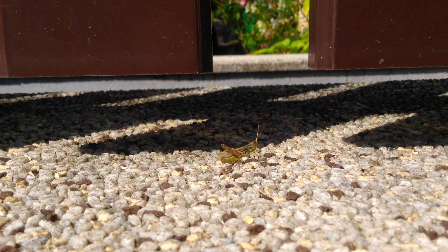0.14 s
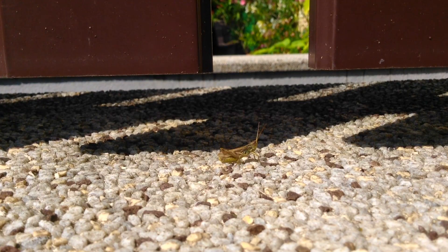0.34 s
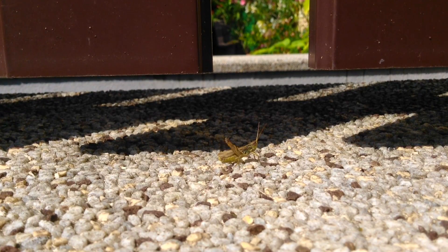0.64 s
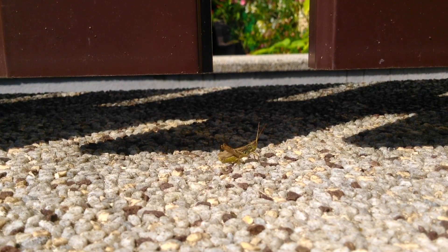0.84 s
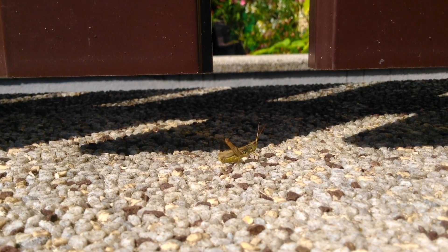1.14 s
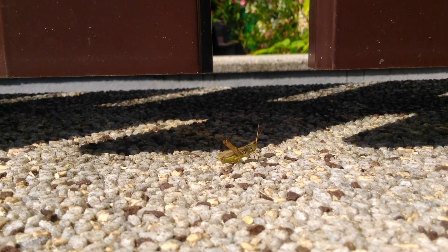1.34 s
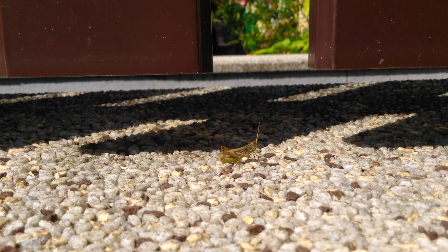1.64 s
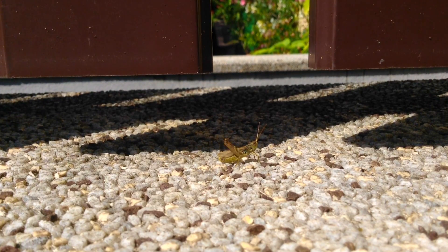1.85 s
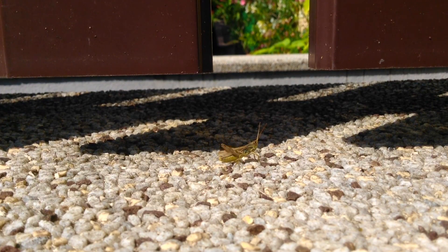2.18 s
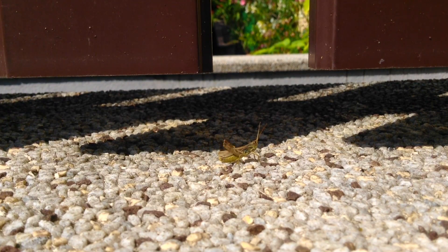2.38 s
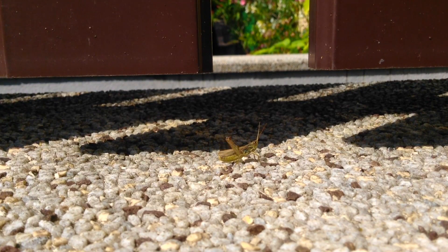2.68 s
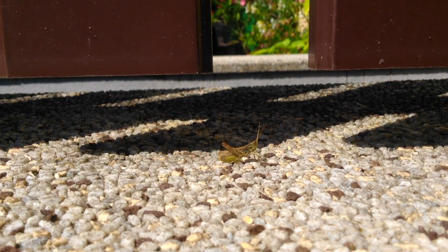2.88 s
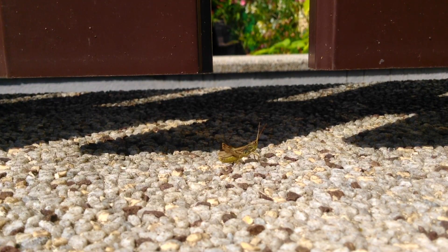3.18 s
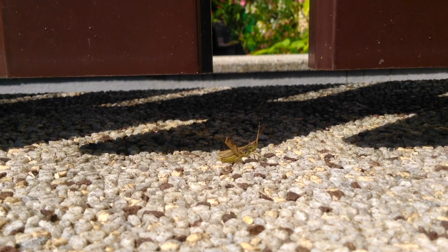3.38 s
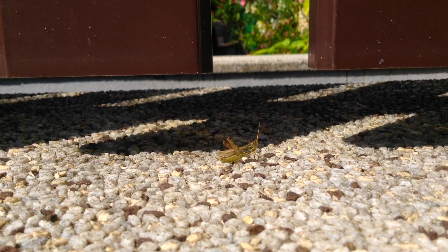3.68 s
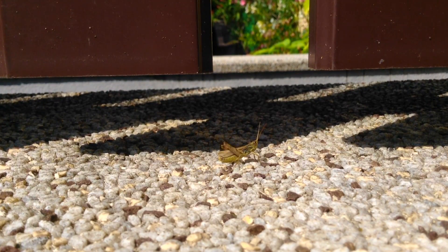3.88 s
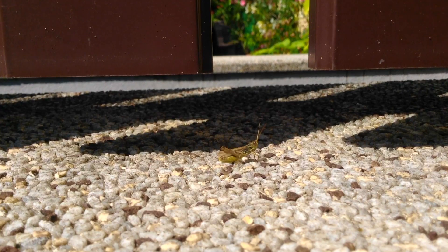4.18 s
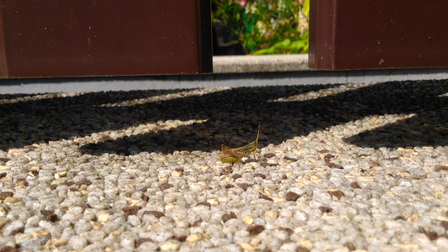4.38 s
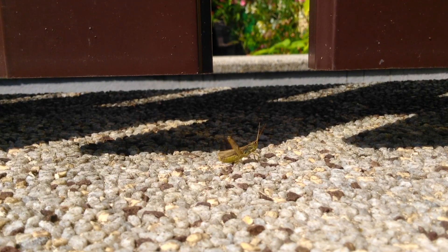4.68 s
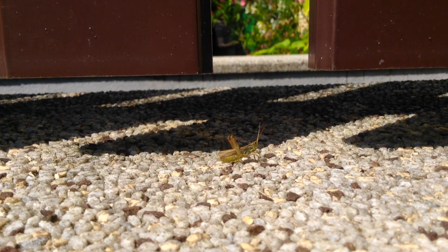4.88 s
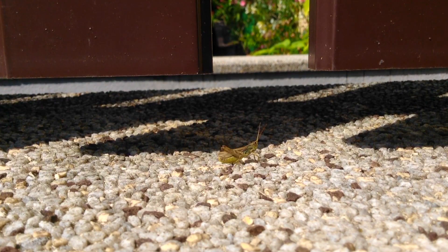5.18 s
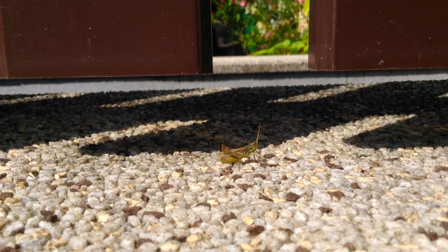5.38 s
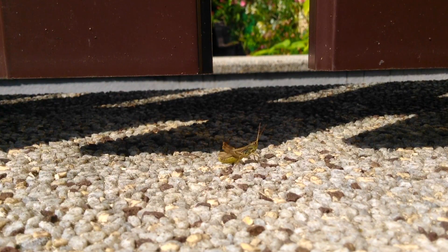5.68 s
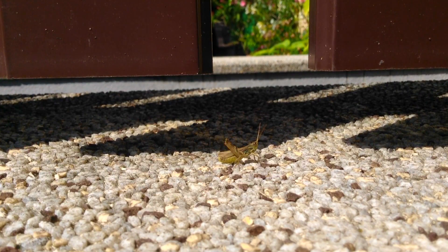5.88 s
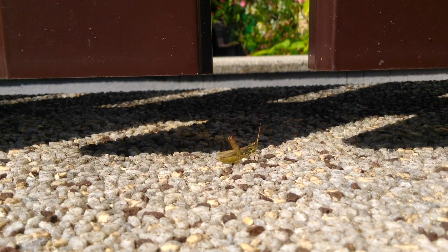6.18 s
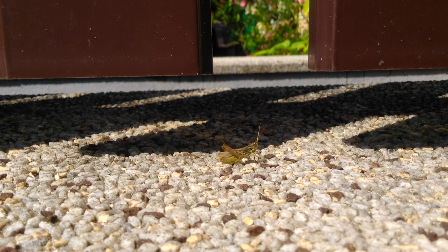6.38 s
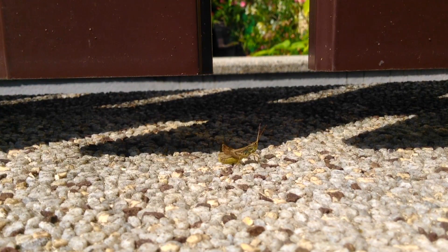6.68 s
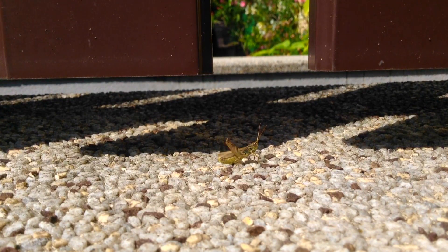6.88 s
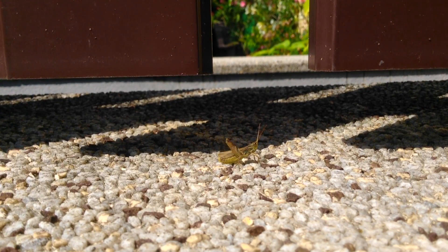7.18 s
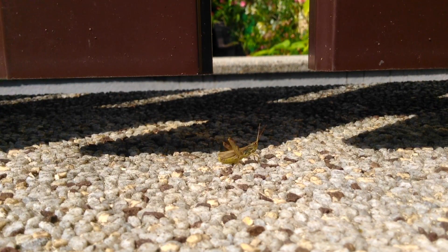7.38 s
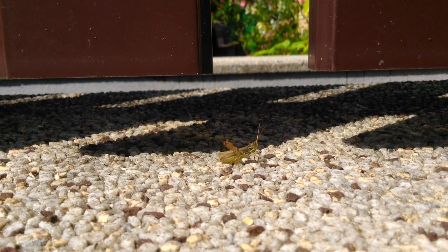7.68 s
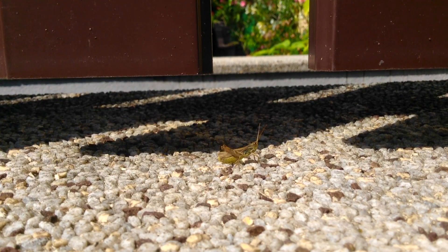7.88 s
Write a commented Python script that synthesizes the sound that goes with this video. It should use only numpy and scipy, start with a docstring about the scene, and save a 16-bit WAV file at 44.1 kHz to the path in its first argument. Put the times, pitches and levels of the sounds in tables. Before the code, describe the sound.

A grasshopper sings close to the microphone on outdoor paving for the whole eight seconds. Its song is high, dry and buzzy, pulsing about four and a half times a second; each pulse is a sharp little zip, a tiny rest and two rasping swells. It begins fairly soft and builds. At about 2.2 seconds it falters for an instant in a crackle of dry clicks, then resumes at once and grows louder, strongest from about 6 seconds to the end. Occasional tiny clicks dot the rasping, and the paving adds a very faint, short echo. Far behind and much quieter, an engine drones unevenly, most noticeable at the start, around 3.5 seconds and from 5.5 to 7 seconds. Faint machinery hums low, and distant road traffic swells and fades near the start, around 3.5 to 4 seconds, 6.5 seconds and the end.

```python
"""A grasshopper sings close by on sunny paving, rubbing the tiny pegs on its hind legs along its wings.
About 4.5 times a second the legs flick down in a sharp zip, rest, then draw two rasping swells.
The song grows louder and falters once, when the legs slip. The paving adds a faint echo.
Far off, an engine drones, machinery hums and road traffic swells and fades."""
import sys
import numpy as np
from scipy import signal
from scipy.fft import rfft, irfft, next_fast_len
from scipy.io import wavfile
from scipy.ndimage import uniform_filter1d, map_coordinates

SR = 44100
rng = np.random.default_rng(int(sys.argv[2]) if len(sys.argv) > 2 else 0)


def to_wav(s):
    """Save 16-bit WAV."""
    ch = np.atleast_2d(s).T  # columns
    pcm = np.round(np.clip(ch, -1, 1) * 32767)  # PCM
    wavfile.write(sys.argv[1], SR, pcm.astype(np.int16))


N = 355005

# Each quick flick of the legs opens one cycle of the song:
# (time [s], level [dB], peg rate [Hz], time the legs lift beforehand [s], trailing leg's pressure [dB])
FLICKS = [(0.017, -30.5, 7510, 0.0083, -20), (0.25, -25.5, 7000, 0.008, -16),
          (0.486, -27, 7600, 0.007, -20), (0.722, -26.0, 6720, 0.01, -3), (0.9585, -27.5, 5700, 0.0069, -9),
          (1.1946, -24.5, 6800, 0.006, -9), (1.4281, -25.5, 5750, 0.008, -16),
          (1.654, -22.7, 7400, 0.008, -16), (1.8814, -24.0, 7250, 0.008, -7),
          (2.1122, -24.5, 6540, 0.0084, -11), (2.3132, -30.5, 7100, 0.001, -12),
          (2.531, -24, 6910, 0.007, -20), (2.755, -23.0, 6490, 0.007, -20), (2.9737, -24, 6460, 0.001, -2),
          (3.1972, -23.5, 7500, 0.008, -20), (3.4177, -24.0, 6800, 0.001, -2),
          (3.6385, -23.0, 7150, 0.001, -11), (3.8608, -22.5, 6720, 0.002, -8),
          (4.0807, -22.5, 6150, 0.001, 0), (4.301, -22.5, 6540, 0.002, -14),
          (4.5185, -21, 6470, 0.0072, -13), (4.7388, -20.5, 6550, 0.001, -6),
          (4.9561, -19.5, 6770, 0.0064, -14), (5.17, -19.5, 6860, 0.0071, -20),
          (5.3917, -18, 6820, 0.0074, -20), (5.6081, -19, 6610, 0.001, -7),
          (5.8248, -18.0, 7100, 0.002, -4), (6.039, -18.5, 6750, 0.005, -2), (6.257, -17, 6760, 0.006, -20),
          (6.4757, -20.0, 6560, 0.001, -3), (6.6943, -17.5, 6700, 0.001, -14),
          (6.9133, -18.3, 6580, 0.00095, -16), (7.128, -19, 6420, 0.001, -2),
          (7.3415, -17, 6650, 0.0069, -20), (7.5527, -19.0, 6940, 0.002, -10),
          (7.7679, -17.5, 6790, 0.0074, -20), (7.9825, -18.5, 6780, 0.0084, -12)]
# How hard the insect rasps; the song builds, falters and builds again: (time [s], level [dB])
EFFORT = [(0, -38), (.9, -36.5), (1.8, -34), (2.4, -34.6), (2.9, -34), (4.4, -31.5), (6.2, -30), (8, -29.5)]
USUAL_EFFORT_DB = -32  # strokes below this count as soft


def amp(db):
    """Turn decibels into a gain to multiply by."""
    return 10 ** (np.asarray(db) / 20)


def unit(x):
    """Scale a signal to an average power of 1."""
    return x / np.sqrt(np.mean(x ** 2) + 1e-20)


def curves(rows, at=None):
    """Join a table's points with straight lines, read at the given places or at every sample's time."""
    places, *columns = np.transpose(rows)
    return [np.interp(np.arange(N) / SR if at is None else at, places, column) for column in columns]


def wobble(rate):
    """A smooth random curve through `rate` new values a second."""
    return map_coordinates(rng.standard_normal(int(N * rate / SR) + 4), [np.arange(N) * rate / SR])


def swell(x, centre, width, flatness):
    """A smooth hump of height 1: flatness 2 is a bell, more gives a flat top."""
    return np.exp(-np.abs((x - centre) / width) ** flatness)


def ring(x, spectrum, size=2048):
    """Let x shake a body that favours some pitches, given as (frequency [Hz], level [dB])."""
    hz, db = np.transpose(spectrum)
    log_gain = np.log(amp(np.interp(np.log(np.fft.rfftfreq(size, 1 / SR) + 1), np.log(hz), db)))
    # this folding makes the body ring only after it is struck, never before
    cepstrum = irfft(log_gain)
    cepstrum[1:size // 2] *= 2
    cepstrum[size // 2 + 1:] = 0
    response = irfft(np.exp(rfft(cepstrum)))
    return signal.fftconvolve(x, response / np.linalg.norm(response))[:N]


def noise(spectrum):
    """Steady noise with the given balance of low and high pitches."""
    return unit(ring(rng.standard_normal(N), spectrum))


def patchy(x, depth_db):
    """Moving air makes each narrow band of a far sound come and go."""
    bands = signal.stft(x, nperseg=2048)[2]
    patches = uniform_filter1d(rng.standard_normal(bands.shape), size=3, axis=0)
    patches = unit(uniform_filter1d(patches, size=7, axis=1))
    return unit(signal.istft(bands * amp(depth_db * patches), nperseg=2048)[1][:N])


def traffic(road_db=-66, wash_db=-62.5, sway_db=.8):
    """Each far vehicle raises the road's rumble and tyre hiss, over a low drone of streets."""
    # Tone of the rumble, the tyres and the streets: (frequency [Hz], relative level [dB])
    rumble_tone = [(25, -48), (70, -44), (100, -30), (135, -19), (165, -6), (215, 3), (260, 0.5),
                   (320, -4.5), (400, -12.5), (520, -27.5), (900, -42)]
    tyre_tone = [(25, -31), (70, -29), (150, -6), (300, -7), (480, -0.5), (590, 4), (720, 0.5), (900, 2),
                 (1400, -2), (2000, -10.5), (4000, -8), (9000, -17), (15000, -19.5)]
    town_tone = [(25, -31), (70, -21), (100, -7), (135, 2), (180, 2), (300, -13.5), (600, -25)]
    # Vehicles going by: (time when nearest [s], half length [s], rumble [dB], tyre hiss [dB])
    passes = [(.12, 0.8, -57, -75), (3.52, .36, -54, -69), (4.02, .25, -57, -66), (4.72, .16, -66, -69),
              (6.42, .8, -53.3, -65.5), (7.95, .3, -54.5, -70)]
    # Loudness of the streets: (time [s], level [dB])
    town_level = [(0, -66.5), (4.1, -66.5), (4.9, -71), (8, -68.5)]
    t = np.arange(N) / SR
    at, length, rumble_db, tyre_db = np.transpose(passes)[..., None]
    nearness = swell(t, at, length, flatness=3) * amp(sway_db * wobble(6))
    rumble_gain = amp(road_db) + np.sum(amp(rumble_db) * nearness, axis=0)
    tyre_gain = amp(wash_db) + np.sum(amp(tyre_db) * nearness, axis=0)
    rumble = rumble_gain * patchy(noise(rumble_tone), depth_db=2.5)
    tyres = tyre_gain * patchy(noise(tyre_tone), depth_db=2.7)
    town_db, = curves(town_level)
    return rumble + tyres + amp(town_db) * noise(town_tone)


def hum(waver=.005, flutter_db=2, fade_db_per_s=20):
    """Far machinery gives faint, slightly unsteady tones that fade in and out."""
    # Each machine tone: (pitch [Hz], level [dB], start [s], end [s])
    tones = [(127, -69, 0.3, 4.4), (260, -64.5, 5, 8.05), (384, -71.8, 2.1, 5.6)]
    t = np.arange(N) / SR
    sound = np.zeros(N)
    for hz, db, start, end in tones:
        level_db = db - fade_db_per_s * np.abs(t - np.clip(t, start, end)) + flutter_db * wobble(2.91)
        angle = 2 * np.pi * np.cumsum(hz * (1 + waver * wobble(7.3))) / SR
        sound += amp(level_db) * np.sin(angle)
    return np.sqrt(2) * sound


def engine(firing_hz=97.35, rise_hz_per_s=1.25, waver=.004, flutter_db=1.3, rough_db=1.6, idle_db=-68):
    """A far engine slowly speeds up and swells under load; the air makes each tone flutter on its own."""
    # The engine's tones: (multiple of the firing rate, relative level [dB])
    harmonics = [(1, -37), (2, 0), (3, -6.5), (4, -28), (5, -24), (6, -21.5), (9, -28)]
    # Spells of hard work: (start [s], end [s], level [dB], extra bark in the third tone [dB])
    loads = [(0.02, .5, -48.5, 0), (.6, .8, -54, 4), (.95, 1.2, -56, -9), (1.6, 1.95, -64.5, 7),
             (3.24, 3.34, -54.5, 9), (3.62, 3.7, -50.5, -7), (3.76, 4.08, -62, 12.5), (4.45, 4.56, -56, -9),
             (4.95, 5.1, -60.5, -6), (5.5, 6.85, -56.5, -5), (7.8, 8.05, -61, 4)]
    t = np.arange(N) / SR
    hz = firing_hz + rise_hz_per_s * t
    angle = 2 * np.pi * np.cumsum(hz * (1 + waver * wobble(9))) / SR
    start, end, load_db, extra_db = np.transpose(loads)[..., None]
    before, after = np.maximum(start - t, 0), np.maximum(t - end, 0)
    # both rise at 95 dB a second, but the bark dies away faster than the drone
    drone_db = np.maximum(idle_db, np.max(load_db - 95 * before - 24 * after, axis=0))
    bark_db = np.maximum(idle_db, np.max(load_db + extra_db - 95 * before - 55 * after, axis=0))
    sound = np.zeros(N)
    for multiple, db in harmonics:
        level_db = (bark_db if multiple == 3 else drone_db) + db
        sound += amp(level_db + flutter_db * wobble(5) + rough_db * wobble(24)) * np.sin(multiple * angle)
    return np.sqrt(2) * sound


def paving_echo(x, echo_db=-25, fade_s=.051):
    """The paving and a door behind it add a faint, short echo."""
    t = np.arange(SR // 4) / SR
    tail = rng.standard_normal(len(t)) * amp(-60 * t / fade_s) * (t > .002)
    return x + amp(echo_db) * signal.fftconvolve(x, tail / np.linalg.norm(tail))[:N]


def leg_cycle(rest_s=.036, rest_scatter_s=.0016, trail_fall_db_per_s=500):
    """The legs lift, flick, rest and land again; `phase` runs from 0 to 1 between two flicks."""
    t = np.arange(N) / SR
    start, _, _, lift_s, trail_db = np.transpose(FLICKS)
    period = np.median(np.diff(start))
    edges = np.concatenate([[start[0] - period], start, [start[-1] + period]])
    cycle = np.clip(np.searchsorted(edges, t) - 1, 0, len(start))
    since, until = t - edges[cycle], edges[cycle + 1] - t
    phase = since / (since + until)
    rest = rest_s + rest_scatter_s * rng.standard_normal(len(edges))
    landed_s = np.maximum(since - rest[cycle], 0)
    lifted = (since < rest[cycle]) | (until < np.append(lift_s, 0)[cycle])
    # a leg that lags behind the other rasps on through the flick as it lifts
    trailing_db = np.append(0, trail_db)[cycle] - trail_fall_db_per_s * since
    return landed_s, phase, lifted, trailing_db


def pushes(phase, speed_lag=.11):
    """The legs bear down twice strongly and once lightly, speeding up just after each push."""
    # Pushes: (place [share of cycle], width [share of cycle], added pressure [dB], added speed [dB])
    humps = [(.298, .095, 4.1, 12.5), (.708, .1, 4.6, 11.6), (.918, .071, 2.3, 7.8)]
    push_db = sum(db * swell(phase, at, width, 3.1) for at, width, db, _ in humps)
    speed_db = sum(db * swell(phase, at + speed_lag, width * 1.04, 2.5) for at, width, _, db in humps)
    return push_db, speed_db


def hitches(phase, softness_db, stray=.022):
    """Pressure lost [dB] as the legs let go for an instant after a push, most of all in soft strokes."""
    # The lapses: (place [share of cycle], width [share of cycle], loss at a depth of 1 [dB])
    lapses = [(.425, .007, 4.5), (.835, .007, 5.5)]
    place = phase + stray * wobble(11)
    depth = np.maximum(.7 + .14 * softness_db + .5 * wobble(9), 0)
    return depth * sum(db * swell(place, at, width, 2) for at, width, db in lapses)


def slip(slip_s=2.202, regrip_s=2.3135, half_grip_s=.038, floor_db=-32, judder_db=3.5, thinning_s=.05):
    """The falter: the wing booms, then the loose legs skip along it and ever fewer pegs catch."""
    t = np.arange(N) / SR
    late = np.maximum(t - slip_s, 0)
    loose = (t > slip_s) & (t < regrip_s)
    loosening_db = np.maximum(20 * np.log10(.5) * (late / half_grip_s) ** 2, floor_db)
    grip_db = loose * (loosening_db - judder_db * np.abs(wobble(180)))
    caught = np.where(loose, .9 * np.exp(-late / thinning_s), 1)
    # the wing's soft skin is 20 dB louder as the legs let go, and 7 dB quieter while they are loose
    boom_db = 20 * (t <= slip_s) * swell(t, slip_s, width=.012, flatness=2) - 7 * loose
    return grip_db, caught, boom_db


def strikes(rate, scatter_db, caught=1, jitter=.22):
    """A row of pegs makes about `rate` tiny clicks a second; only the share `caught` sounds."""
    rate = np.clip(rate, 1, SR)
    passed = np.cumsum(rate) / SR
    pegs = np.arange(int(passed[-1]))
    at = np.searchsorted(passed, pegs + jitter * rng.standard_normal(len(pegs))).clip(0, N - 1)
    size = unit(amp(scatter_db * rng.standard_normal(len(pegs)))) * rng.choice([-1, 1], len(pegs))
    return np.bincount(at, size, N) * np.sqrt(SR / rate) * (rng.random(N) < caught)


def chatter(centre_hz, width_hz=750):
    """The leg's whistling chatter: a narrow band of noise that glides with centre_hz."""
    angle = 2 * np.pi * np.cumsum(centre_hz) / SR
    smooth = signal.butter(2, width_hz, fs=SR, output="sos")
    a, b = signal.sosfilt(smooth, rng.standard_normal((2, N)))
    return unit(a * np.cos(angle) + b * np.sin(angle))


def snags(scuff_db=-21, fade_s=.003):
    """Single pegs catch and snap free, each with a dry click and a trace of scuffing."""
    # The snaps, thickest in the falter: (time [s], level [dB])
    snaps = [(.0365, -35), (.2695, -35), (.478, -23), (.503, -36), (.9415, -24), (.9755, -32),
             (1.2146, -33), (2.2048, -19), (2.2056, -17), (2.2255, -25), (2.227, -26), (2.2293, -23.5),
             (2.2303, -24), (2.2312, -25), (2.2387, -26), (2.2396, -25), (2.2414, -27.5), (2.2498, -28.5),
             (2.251, -29), (2.2533, -27.5), (2.2622, -28.5), (2.286, -41), (2.2874, -40), (2.2889, -42),
             (2.3027, -32), (2.3357, -33), (2.5605, -29), (2.564, -28), (3.2272, -26), (3.4487, -30),
             (3.889, -29), (4.5468, -30), (4.5503, -27), (4.7692, -22), (5.4255, -27), (6.9408, -33),
             (6.9475, -24)]
    # How the wing rings after a snap: (frequency [Hz], relative level [dB])
    snap_tone = [(1500, -45), (3000, -24), (4500, -11), (6000, -4), (8000, 3), (10000, 0), (15000, -5),
                 (19000, -20)]
    t = np.arange(N) / SR
    at, db = np.transpose(snaps)
    clicks = np.bincount(np.round(at * SR).astype(int), amp(db), N)
    scuffs = sum((t >= s) * (t < s + 2 * fade_s) * amp(level - 60 * np.clip((t - s) / fade_s, 0, 2))
                 for s, level in snaps)
    return ring(clicks + amp(scuff_db) * scuffs * rng.standard_normal(N), snap_tone)


def flicks(usual_length_s=.0072, slowing=.3, seated_db=-23.3, skip_db=3):
    """In the quick downstroke the pegs pass so evenly that they make a falling whistle and a scrape."""
    # Tone of the scrape: (frequency [Hz], relative level [dB])
    scrape_tone = [(1500, -56), (2900, -25), (3900, -9), (5000, 4.5), (7500, 6.5), (9000, 1.5),
                   (11000, 3.5), (13500, 2.5), (15500, -6)]
    t = np.arange(N) / SR
    cycle = np.clip(np.searchsorted(np.transpose(FLICKS)[0], t) - 1, 0, None)
    start, db, peg_hz, _, _ = np.array(FLICKS)[cycle].T
    effort_db, = curves(EFFORT, start)
    length_s = usual_length_s + .00012 * (effort_db - USUAL_EFFORT_DB)  # more effort draws it out
    travel = (t - start) / length_s
    # in a weak flick the leg sits poorly: a less even whistle, more overtone and much more scrape
    bright_db = np.minimum(1.22 * (seated_db - db), 3.5)
    # the scrape trails on as the leg stops: (travel [flick lengths], whistle [gain], scrape [gain])
    shape = [(0, 0, 0), (.04, .6, 1.2), (.35, 1.2, 1.63), (.9, .5, 1.22),
             (1.2, .0065, .45), (1.5, .018, .11), (2.3, .002, .0084)]
    force, drag = curves(shape, travel)
    jitter = (.05 + .013 * np.maximum(bright_db + 2, 0)) * wobble(1800)
    rate = peg_hz * (1 + slowing * (.44 - np.clip(travel, 0, 2)) + jitter)
    angle = 2 * np.pi * np.cumsum(rate) / SR
    overtone = amp(-1.6 + .6 * bright_db) * np.sin(2 * angle)
    whistle = np.sqrt(2) * (amp(1.5) * np.sin(angle) + overtone)
    scrape = amp(-2 + 1.24 * bright_db) * unit(ring(strikes(rate, scatter_db=1.5), scrape_tone))
    balance = 1 / np.sqrt(1 + amp(2 * bright_db))  # turns bright flicks down
    skips = amp(skip_db * np.minimum(wobble(1100), 0))  # skipped pegs dent the level
    return balance * amp(db) * skips * (force * whistle + drag * scrape)


def rasp(slow_peg_hz=3002, fast_peg_hz=6000, slow_chatter_hz=7400, fast_chatter_hz=9600,
         light_db=-2.1, rest_db=-23, settle_s=.02, shake_db=.9):
    """Pegs strike the wing: pressure sets the level, and a faster leg shakes the stiff edge more."""
    # How the wing rings at its main vein, its stiff edge and its soft skin, and as one whole flap:
    # (frequency [Hz], relative level [dB])
    vein_tone = [(1500, -57), (2700, -36), (4400, -31), (5800, -12.5), (6800, -4.5), (7600, 0), (8300, 1.5),
                 (9200, -3.5), (12000, -11), (15200, -13.5)]
    edge_tone = [(3000, -45), (6000, -22), (8000, -1.5), (9500, 1), (10800, 1), (12000, -1), (13300, -0.5),
                 (15200, -3.5)]
    skin_tone = [(1200, -49), (2000, -40.5), (2700, -28), (3300, -21), (3950, -13.3), (4700, -2.5),
                 (5600, 6.5), (6500, 1), (8000, -17.5), (12000, -38.5)]
    flap_tone = [(1200, -33.5), (2300, -13.5), (2750, -10), (3100, 1), (3450, -3.5), (4100, -18.5),
                 (7000, -39)]
    landed_s, phase, lifted, trailing_db = leg_cycle()
    effort_db, = curves(EFFORT)
    grip_db, caught, slip_boom_db = slip()
    # soft strokes push earlier, sound thinner and fade before their end
    softness_db = USUAL_EFFORT_DB - effort_db
    push_db, speed_db = pushes(phase + .0067 * softness_db + .011 * wobble(25))
    thin_db = .09 * softness_db
    fade_db = .72 * np.maximum(softness_db, 0) * np.interp(phase, [.8, .92], [0, 1])
    # the legs touch down with a small tick, then settle onto the wings
    tick_db = 6.5 * swell(landed_s, 0, width=.0012, flatness=2)
    settled = np.clip(landed_s / settle_s, 0, 1)
    pressure_db = light_db + push_db - 7.5 * (1 - settled) + tick_db - fade_db
    speed = (speed_db / speed_db.max()) ** 2
    run_up = np.interp(phase, [.14, .3], [.2, 1])  # each stroke starts slowly
    peg_rate = (slow_peg_hz + (fast_peg_hz - slow_peg_hz) * speed) * run_up
    chatter_hz = slow_chatter_hz + (fast_chatter_hz - slow_chatter_hz) * speed
    # in soft strokes the low scrape and the chatter carry on between the pushes
    slack_db = np.maximum(softness_db, 0) * (push_db.max() / 2 - push_db)
    boom_db = 1.19 * push_db + .115 * slack_db
    chatter_gain = amp(-5.8 + .05 * slack_db - 4 * speed)
    # the legs barely touch the wing just before each flick and during the rest after it
    contact_db = np.where(lifted, np.maximum(rest_db, trailing_db), pressure_db)
    contact = uniform_filter1d(amp(contact_db), size=40)
    # now and then the grip gives way for a few milliseconds
    stutter_db = 3.5 * np.maximum(wobble(260) - 1.4, 0) + hitches(phase, softness_db)
    force = contact * amp(effort_db + grip_db + shake_db * wobble(220) - stutter_db)
    pegs = force * strikes(peg_rate, scatter_db=2.5, caught=caught)
    vein = ring(pegs * amp(-7.4), vein_tone)
    edge = ring(pegs * amp(-7.7 + speed_db + thin_db), edge_tone)
    skin = ring(pegs * amp(-14.9 + boom_db + slip_boom_db - thin_db), skin_tone)
    flap = ring(pegs * amp(-29.2 + boom_db / 2 + .68 * softness_db), flap_tone)
    return vein + edge + skin + flap + force * caught * chatter_gain * chatter(chatter_hz)


def scene():
    """The near grasshopper over the far background, in one channel."""
    grasshopper = paving_echo(rasp() + flicks() + snags())
    return (grasshopper + engine() + hum() + traffic())[None]


def record(dry):
    """Cut away the very highest treble with a steep filter."""
    top_hz = 15400
    size = next_fast_len(N + SR // 2)
    hz = np.fft.rfftfreq(size, 1 / SR)
    gain = 1 / np.sqrt(1 + (hz / top_hz) ** 300)
    return irfft(rfft(dry, size) * gain, size)[..., :N]


dry = scene()
out = record(dry)
to_wav(out)
```